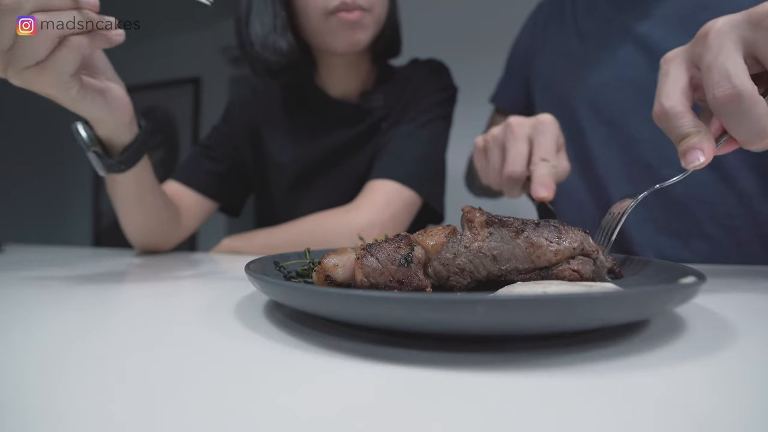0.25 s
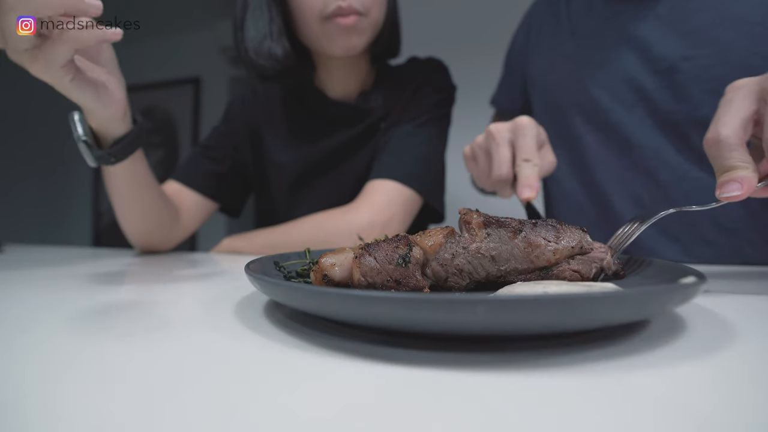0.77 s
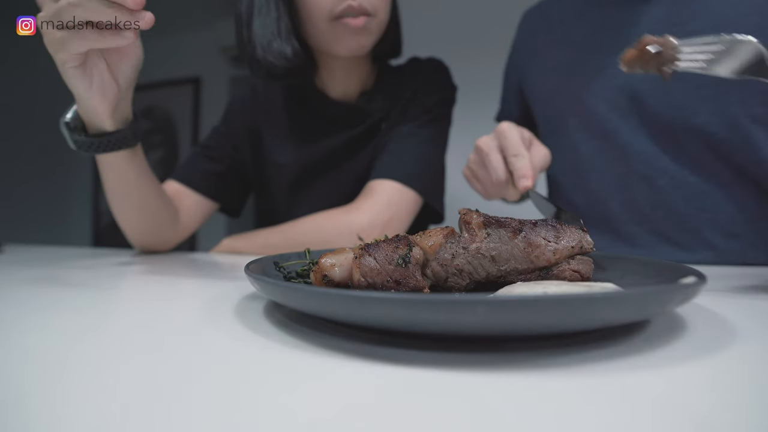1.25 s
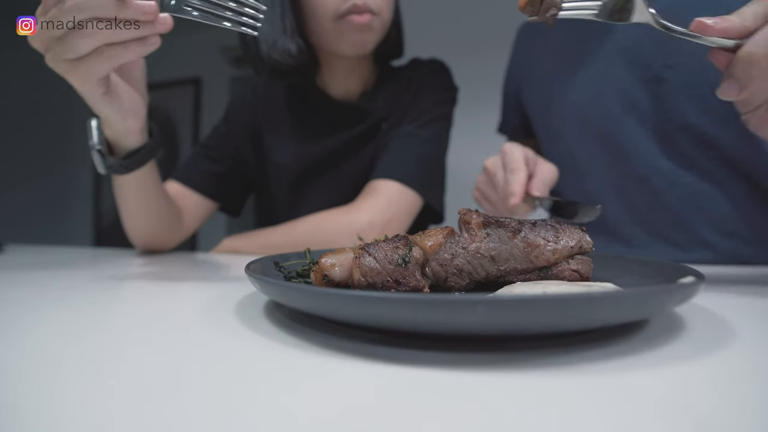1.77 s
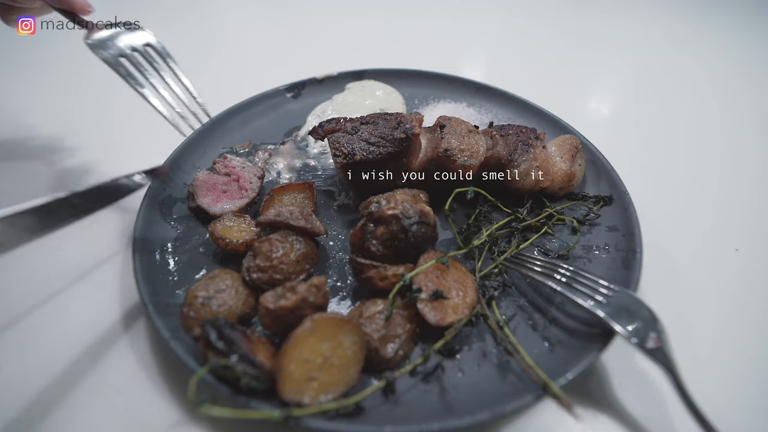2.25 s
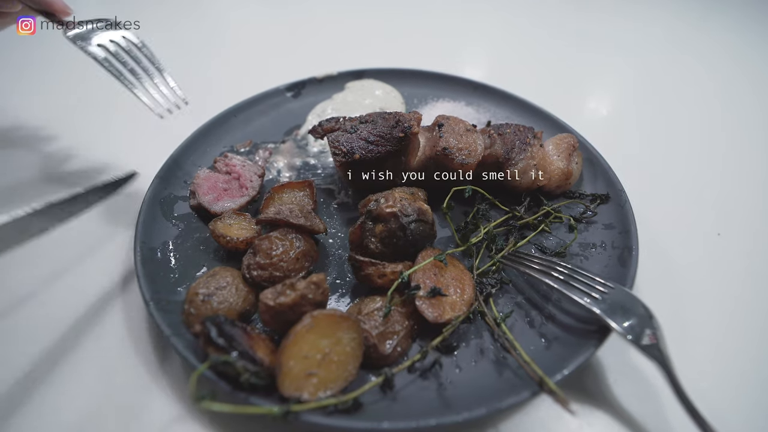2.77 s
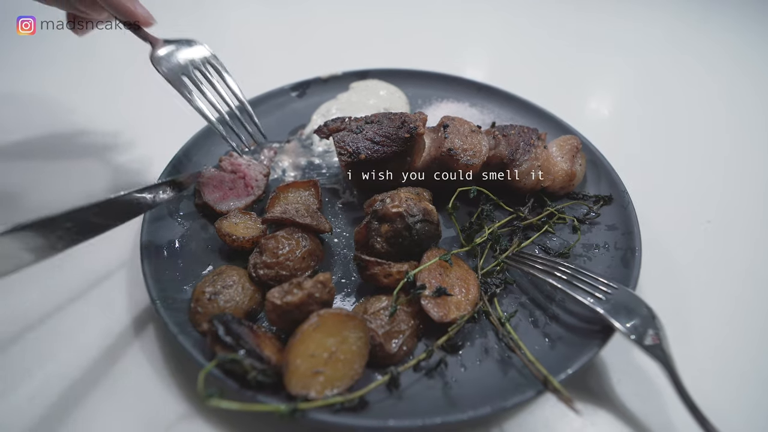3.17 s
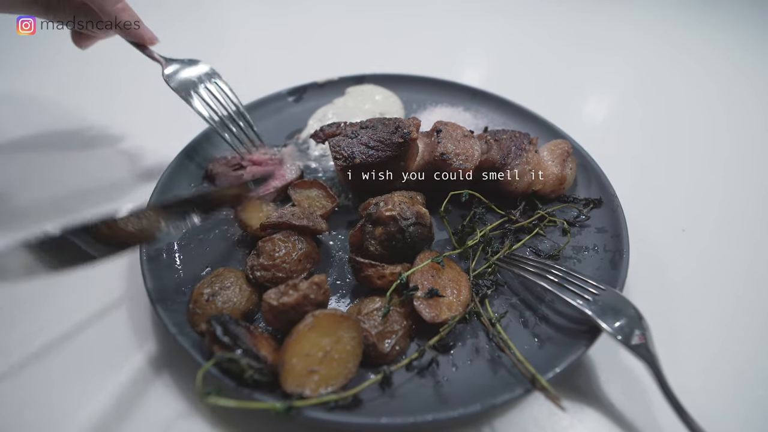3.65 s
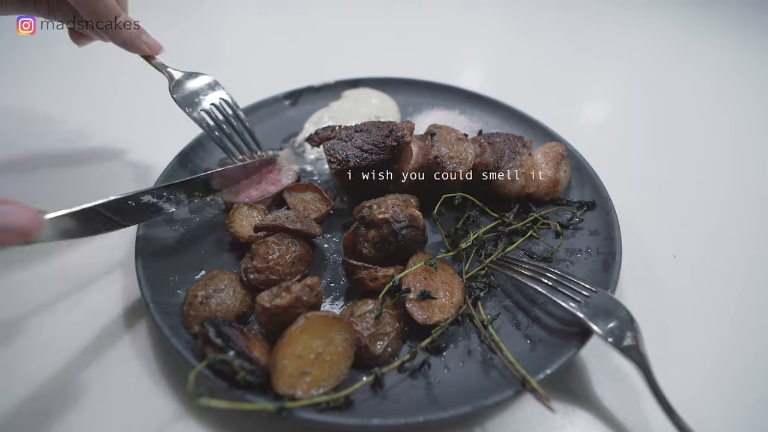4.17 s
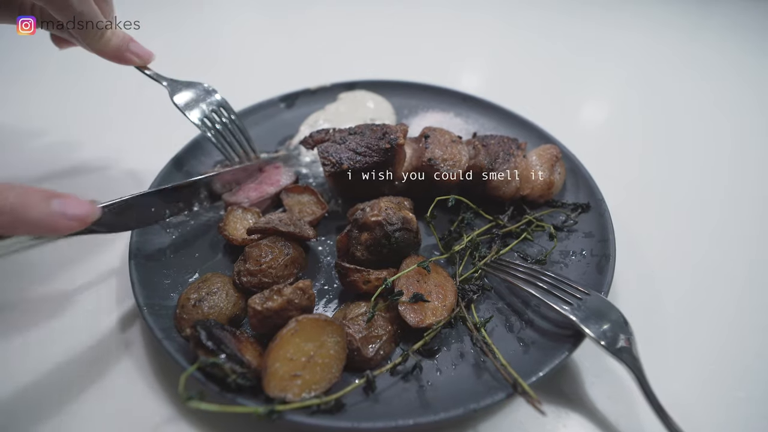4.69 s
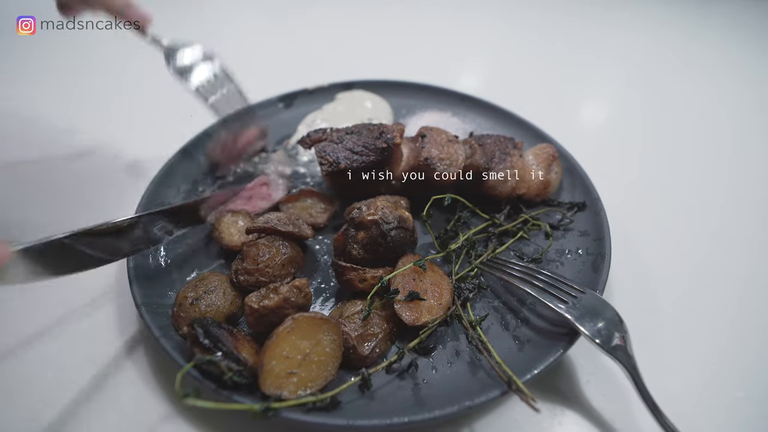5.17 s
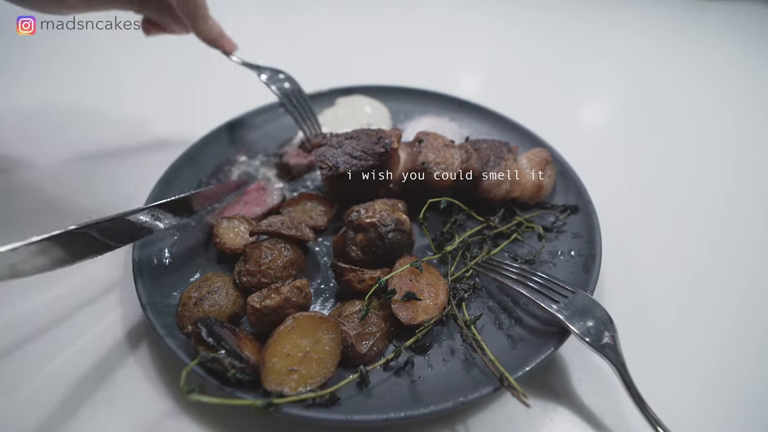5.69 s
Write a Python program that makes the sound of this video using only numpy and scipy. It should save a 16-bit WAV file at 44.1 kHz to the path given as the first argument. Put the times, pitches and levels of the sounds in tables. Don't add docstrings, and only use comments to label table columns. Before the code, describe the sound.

Cutlery on a plate in a bare room: sharp opening clacks, faint sawing and ticks, a scene change, then ringing blows and a juddering scrape.

```python
import sys
import numpy as np
from scipy import signal
from scipy.fft import rfft, irfft, next_fast_len
from scipy.io import wavfile
from scipy.ndimage import map_coordinates

SR = 44100
rng = np.random.default_rng(int(sys.argv[2]) if len(sys.argv) > 2 else 0)


def volts_from_decibels(level):
    exponent = np.asarray(level, float) / 20
    return 10 ** exponent


def bounce(signal):
    frames = np.transpose(np.atleast_2d(signal))
    limited = np.clip(frames, -1, 1)
    pcm = np.round(limited * 32767).astype(np.int16)
    wavfile.write(sys.argv[1], SR, pcm)


N = 261513
T = np.arange(N) / SR
CUT_S = 2.2018

# t/s, peak level/dB, thud level/dB, room level/dB, bite level/dB
BLOWS = [
    (0.0645, -0.4, -15, -28.5, -16.5),
    (0.3553, -3.5, -18, -26.5, -26.5),
    (3.3911, -1.5, -12, -2, -20.5),
    (4.6158, -5.5, -16.5, -6, -20.5),
]
# f/Hz, level/dB, swell/ms
CLACK_MODES = [[(2430, -3.5, 2.0), (2700, 0, 2.4), (3000, -12, 1.6), (3300, 0, 2.3)] + [ (4090, -27, 1.5),
               (5290, -20, 1.4), (5700, -14, .9), (6270, -23, 2.5), (8790, -18, 1.5), (11000, -36, .6),
               (12800, -36, 1.2), (14800, -36, .5)], [(2450, -1, 2.2), (2750, -6, 2.4), (3000, -12, 1.6),
               (3270, 0, 2.2)] + [ (3730, -12, 2.8), (5240, -26, 1.6), (6260, -26, 2.5), (8630, -19, 1.6),
               (10300, -36, 1.5), (11700, -36, .6), (13200, -30, .9), (14700, -31, .5)], [(2450, -6, 1.6),
               (2850, -2, 1.1), (3240, 0, 1.3), (3930, -1, 1.2), (4800, -14, 1.5), (5610, -11, 1.1),
               (6310, -14, 1.6), (7780, -21, 1.6), (9460, -32, 1.3), (11200, -36, 1.3), (13700, -44, .6)],
               [(1790, -1, 1.3), (2260, -9, 1.8), (2630, -2, 1.6), (2910, -3, 1.6), (3350, -1, 1.4),
               (3570, -8, 2.5), (3940, -8, 1.5), (4720, -11, 1.3), (6380, -13, 1.2), (7870, -19, 1.4),
               (9500, -26, 1.3), (11300, -26, 1.5)]]
CLACK_SENSE = [1, 1, -1, 1]
AFTERRING_DB = [-16.5, -14, -13, -19]
AFTERRING_S = 0.064
# f/Hz, width/Hz, level/dB
THUD_MODES = [
    [(397.3, 125, 7.5), (1021, 150, 7.5)],
    [(316, 76, -6), (972, 220, -10.5)],
    [(552, 94, 5), (786, 37, 8), (1060, 260, 3.5)],
    [(715, 170, -2.5), (1200, 160, 0)],
]
# f/Hz, width/Hz, level/dB
LASTING_EARLY = [
    [(2447, 160, 3), (2754, 160, 6), (3350, 160, 2.5), (5770, 1294, 6), (8740, 550, -19)],
    [(2450, 150, -5), (2760, 150, -3), (3380, 160, -4), (5780, 790, -8), (8580, 490, -11)],
]
# f/Hz, width/Hz, level/dB
LASTING_LATE = [[(510, 113, -14.5), (640, 215, -11.0), (903, 69, -14.0), (1210, 210, -13.5),
                (1545, 360, -36.0), (2140, 270, -15.0), (2473, 90, -7.0), (2990, 300, -9.5),
                (3273, 130, -3.5), (3370, 98, 0.5), (3480, 35, -11), (3650, 96, -5.5), (4050, 170, -14.5),
                (5510, 290, -18.5)] + [(350, 110, -25.5), (4800, 1730, -21.0), (8300, 2600, -37),
                (12000, 4400, -56.0), (4900, 590, -23.5)], [(726, 170, 2.0), (1356, 136, 3.5),
                (2170, 53, -2.0), (2580, 61, -3), (2910, 66, -9), (3453, 33, 8.5), (3505, 87, 9.0),
                (3940, 32, -22.0), (4450, 380, -9.0), (5750, 120, -1.5)] + [(2000, 1660, 4.0),
                (4400, 2700, -32.0), (7600, 1500, -20.0), (12500, 3000, -66), (4860, 210, -13.5)]]
STEEL_HZ = [
    [],
    [],
    [2455, 3391, 4807, 6280, 6272, 7817, 9430, 11170],
    [3456, 3560, 4807, 4910, 6365, 6390, 7800, 9510, 11300],
]
# level/dB, t60/s
STEEL_DECAY = [
    [],
    [],
    [(-31.5, 0.59), (-30, 0.55), (-29.5, 0.56), (-32.5, 0.43), (-44.5, 0.86), (-44, 0.39), (-55, 0.39),
     (-53, .3)],
    [(-40, 0.57), (-41, 0.65), (-48, 0.61), (-45, 0.25), (-23.5, 0.059), (-46, 0.32), (-47, 0.45),
     (-55, 0.54), (-47, 0.2)],
]
SLAP_S = [.0325, 0.033, .028, 0.052]
SLAP_DB = [-24, -21.5, -21.5, -17]

# peak t/s, level/dB, rise/s, fall/s, brightness/dB
PUSHES = [
    [(.074, -29, 0.017, 0.056, -10), (.12, -40.5, 0.056, 0.15, -25), (.29, -59.5, .12, 0.073, 1.5)],
    [(.372, -34, 0.031, 0.08, -10.5), (.465, -39, 0.12, 0.044, -22)],
    [(.6, -41.5, 0.0062, 0.069, -22), (.645, -43, 0.084, 0.059, -16), (.785, -43, 0.091, 0.052, -11.5),
     (.82, -48, 0.046, 0.015, -22)],
    [(4.882, -44, 0.029, 0.061, -1.5), (4.915, -42, 0.1, 0.098, -11), (5.082, -39.5, 0.1, 0.093, -17)],
    [(5.819, -47, 0.034, 0.045, -37), (5.826, -33, 0.0037, 0.13, -8), (5.925, -57, 0.027, .05, -25)],
    [(.915, -49, 0.11, 0.12, -13), (.955, -54, .07, 0.025, -16), (1.113, -48.5, 0.18, 0.065, -10.5)],
    [(5.185, -62, .04, .05, -5), (5.222, -43, 0.037, 0.069, -16.5), (5.264, -37.5, 0.082, 0.022, -15.5)],
    [(.645, -51, 0.063, 0.051, -20), (.745, -55, 0.05, 0.091, -18), (.805, -49.5, 0.062, 0.03, -8),
     (.885, -58, .04, 0.05, -20), (1.06, -51, 0.074, .03, -17)],
    [(5.3, -43, 0.096, 0.061, -13.5), (5.335, -53.5, 0.056, 0.039, -6), (5.4, -71, .08, .15, -7)],
    [(3.635, -37, 0.038, .09, -42), (3.675, -37, 0.12, 0.065, -42.5), (3.79, -47, .08, 0.073, -42),
     (3.85, -44.5, 0.12, 0.048, -45)],
]
# f/Hz, width/Hz, level/dB
PUSHED_MODES = [
    [(2460, 160, 0), (2806, 150, 1), (3410, 200, 0), (5650, 470, -13), (8400, 1500, -22),
     (14300, 1940, -30)],
    [(2475, 260, -2.5), (2720, 240, 0), (3325, 240, 4), (5750, 384, -18), (6160, 170, -17),
     (8500, 1200, -22.5), (14310, 2400, -28.5)],
    [(1320, 170, -3.5), (2370, 210, -2.5), (2760, 220, -3), (3370, 260, -9), (4900, 150, -24),
     (5900, 500, -24), (7600, 340, -20), (9700, 600, -24.5), (12900, 400, -26), (14240, 300, -23)],
    [(2455, 62, 1), (2910, 210, -0.5), (3470, 270, 0), (5000, 130, -13.5), (5770, 370, -11.5),
     (6000, 290, -6), (7950, 290, -16), (9000, 450, -12), (13400, 1400, -33)],
]
# f/Hz, width/Hz, level/dB
PUSHED_MODES_LATE = [
    [(2500, 150, -7), (2875, 160, -18.5), (3984, 190, -9), (4000, 310, -15), (4670, 230, -12.5),
     (6260, 350, -29), (7400, 500, -25), (8500, 360, -28.5), (9400, 280, -42)],
    [(2440, 310, -0.5), (2720, 280, -18), (3390, 360, -3.5), (4770, 150, -17), (5800, 460, -26),
     (7700, 400, -18), (9840, 370, -18), (13200, 500, -18), (14300, 300, -34)],
    [(2465, 49, 0.5), (2980, 210, 2), (3550, 230, -1), (5660, 290, -10), (9050, 600, -25),
     (13600, 1400, -33.5)],
    [(3400, 310, 0), (5900, 300, -11)],
    [(2490, 90, 4.5), (2900, 300, 0.5), (3640, 370, -14), (5660, 380, -8), (9050, 600, -28)],
    [(2487, 45, -13.5), (3280, 80, -3.5), (3393, 78, -1)],
]
# f/Hz, width/Hz, level/dB
DENSE_MODES = [(3350, 680, -22.5), (5730, 880, -23.5), (8930, 1000, -29.5), (13500, 2840, -47.5)]
DENSE_DB = [-4.5, 0.5, -1, -13, -12, 10.5, -17.5, -12, -20, -4]
EDGE_DB = 24
LINGER_DB, LINGER = -23, 3

# t/s, peak level/dB, swell/ms
JUDDER = [(0.054, -40, 7.6), (.345, -39, 7), (5.779, -53, 3.8), (5.792, -55, 5), (5.806, -37, 4.2),
          (5.816, -26.5, 3.5), (5.824, -19, 3.3), (5.827, -18.5, 4.6), (5.836, -21.5, 2.5),
          (5.842, -22, 2.8), (5.845, -31, 1.9), (5.858, -25, 2.7), (5.865, -24, 2.4), (5.875, -33, 3),
          (5.893, -33, 2.8), (5.9105, -27.5, 1.8), (5.916, -35, 2.7), (5.9205, -28, 3)]
JUDDER_HZ, JUDDER_SPREAD = 2477, 0.0088

# t/s, peak level/dB, f/Hz
LOW_TICKS = [(.5995, -28.5, 2580), (.9068, -36, 2360), (1.0913, -29.5, 2720), (1.1107, -31, 2450),
             (1.116, -34, 2400), (4.1898, -35, 3400), (4.2392, -27, 3250), (4.2395, -30.5, 2500),
             (4.2445, -42, 2500), (4.2497, -37, 2560), (4.2635, -46, 2600), (4.2497, -41, 3250),
             (4.2914, -46, 2650), (5.0674, -48, 2960), (5.0774, -28, 2910), (5.0899, -27, 3390),
             (5.5324, -46, 3700), (5.55, -47, 3540), (5.583, -44.5, 3650), (5.7464, -34.5, 3390),
             (.715, -43, 3300), (.7784, -36, 2600), (.8712, -43, 2580), (1.0338, -38.5, 2660),
             (5.0449, -45, 3400), (5.1347, -35, 3400), (5.1895, -40, 2900), (5.2155, -45, 3400),
             (5.8245, -26, 3960), (5.8555, -23, 3970)]
# t/s, peak level/dB, f/Hz
HIGH_TICKS = [(.318, -42, 13500), (1.143, -48, 10500), (2.1733, -23, 6900), (2.2006, -34, 5150),
              (4.114, -49.5, 7400), (4.2388, -30, 6950), (4.2447, -28.5, 7170), (4.2842, -40, 7300),
              (4.2884, -41, 7450), (4.2974, -46.5, 7400), (4.3241, -42.5, 7100), (4.8489, -32, 6400),
              (5.0255, -18.5, 6300), (5.0334, -40, 5780), (5.0903, -30, 5660), (5.0964, -44, 5820),
              (5.1114, -43, 5430), (5.3253, -39, 5660), (5.5248, -54, 6400), (5.534, -53.5, 5900),
              (5.546, -57, 7600), (5.5493, -52, 5500), (5.5837, -52, 5640), (5.5947, -49, 6240),
              (5.7544, -55, 6440), (5.848, -34.5, 8500), (5.856, -38, 8500)]
# t/s, peak level/dB, f/Hz
OVERTONES = [(2.173, -28.5, 8740), (2.1737, -25, 4330), (3.6258, -56, 8400), (4.114, -57, 10500),
             (4.19, -50, 2200), (4.19, -57, 4900), (4.19, -57, 6300), (4.2843, -43, 1900),
             (4.2843, -43, 5900), (4.2845, -42, 4260), (4.2845, -49, 8500), (4.849, -40, 4880),
             (4.849, -43, 7400), (4.849, -40, 9000), (5.0334, -45, 7200), (5.0903, -44, 7800),
             (5.0903, -48, 9900), (5.0964, -43, 7500), (5.326, -38.5, 7150), (5.326, -46, 9000)]
# t/s, peak level/dB, f/Hz
BUMPS = [(.0968, -20, 350), (.3885, -22, 350), (.999, -22, 1200), (4.863, -24.5, 593), (5.755, -26, 634)]
# t/s, peak level/dB, f/Hz
TABLE_HUMS = [(1.1, -40.5, 788), (5.06, -46.5, 850)]
# t/s, peak level/dB, f/Hz
FORK_PINGS = [(.66, -64, 4800), (1.11, -62, 4800)]

# f/Hz, t60/s
WALLS = [(300, 0.57), (800, 0.52), (1500, 0.49), (2400, 0.89), (3400, 0.98), (4500, 0.753), (6000, 0.65),
         (9000, 0.29), (15000, 0.17)]

# hum level/dB, hum drift/(dB/s), settled hiss/dB, extra hiss at the start/dB, settling/s
SHOTS = [
    (-40.5, -0.9, -68.5, 4.5, 1.6),
    (-49.5, -0.24, -76, 10, 0.33),
]
# f/Hz, level/dB
HUM = [
    [(24, -51.5), (40, -29.5), (64, -24.5), (83, -25), (142, 0.5), (287, 0), (360, -6), (413, -4),
     (635, -9.5), (815, -5.5), (1120, -12.5), (1280, -13), (9000, -59.5), (11700, -75), (19800, -120)],
    [(24, -43.5), (40, -29), (64, -41.5), (81, -16), (159, -4), (195, -3.5), (495, -9.5), (593, -11.5),
     (711, -10), (833, -12.5), (1310, -15.5), (2830, -33.5), (9000, -63), (11700, -80.5), (19800, -120)],
]
# f/Hz, level/dB
AIR = [(1500, -4), (2500, 1.5), (4000, 6), (6000, 6.5)]
# f/Hz, level/dB
NULL = [(105, 0), (120, -10), (132, 0), (170, 0), (185, -4), (200, 0)]
# f/Hz, width/Hz, level/dB
DRONE = [(99, 12, -8), (135, 9, -2), (160, 10, 0), (234, 10, -5), (288, 6, 3), (425, 10, -8),
         (726, 10, -11)]
# f/Hz, level/dB
HISS = [(2000, -33), (5000, -4), (8000, -1), (12000, -3), (15500, -4.5)]
FAN_S, FAN_DB, FAN_BACK_S = 3.1, -1.5, 1


def blows():
    out, t = np.zeros(N), np.arange(SR) / SR
    for k, (s, db, thud_db, room_db, bite_db) in enumerate(BLOWS):
        clack = peak(damped_clack(k, t))
        thud = filtered(impulse(t), modes(THUD_MODES[k], order=2))
        near = volts_from_decibels(db) * (clack + volts_from_decibels(bite_db) * peak(glaze_bite(t)) + volts_from_decibels(thud_db) * peak(thud))
        lasting = lasting_lines(k, t)
        lasting = lasting * volts_from_decibels(room_db) * np.linalg.norm(near) / np.linalg.norm(lasting)
        steel = free_steel(k, t)
        slap = filtered(volts_from_decibels(db) * clack, modes([(3400, 863, 0.0015)]))
        add(out, s, near)
        add(out, s + .001, steel + 0.338 * lasting)
        add(out, s + SLAP_S[k], volts_from_decibels(SLAP_DB[k]) * slap)
        add(out, s, room(lasting + 0.23 * steel + volts_from_decibels(room_db - 17.5) * near))
    return out


def damped_clack(k, t):
    out = 0
    for j, (hz, level, ms) in enumerate(CLACK_MODES[k]):
        u = t * 1000 / ms
        pressed = (u * np.exp(1 - u)) ** 2
        afterring = volts_from_decibels(AFTERRING_DB[k] - 60 * t * 2 / (AFTERRING_S * ms)) * (1 - np.exp(-u)) ** 2
        out = out + CLACK_SENSE[k] ** j * volts_from_decibels(level) * (pressed + afterring) * np.sin(2 * np.pi * hz * t)
    return out


def glaze_bite(t):
    onset = 1 - np.exp(-(t / 0.00025) ** 2)
    burst = rng.standard_normal(len(t)) * volts_from_decibels(-60 * t / 0.016) * onset
    return filtered(burst, modes(DENSE_MODES))


def lasting_lines(k, t):
    lines = filtered(impulse(t), modes((LASTING_EARLY + LASTING_LATE)[k], order=2, sense=0.96))
    dull_hz = 9500
    return filtered(lines, lambda f: (1 - (f / dull_hz) ** 2 + 1.4j * f / dull_hz) ** -2)


def free_steel(k, t):
    out = 0
    for hz, (level, t60) in zip(STEEL_HZ[k], STEEL_DECAY[k]):
        beat_db = 4 * np.tanh(wobble(t, rate=65))
        phase = 2 * np.pi * hz * t + .65 * wobble(t, rate=65)
        out = out + volts_from_decibels(level - 60 * t / t60 + beat_db) * np.sin(phase)
    return out


def strokes():
    out = np.zeros(N)
    for rows, excited, dense_db in zip(PUSHES, PUSHED_MODES + PUSHED_MODES_LATE, DENSE_DB):
        start = max(rows[0][0] - LINGER * rows[0][2], 0)
        end = rows[-1][0] + 2 * LINGER * rows[-1][3]
        t = np.arange(round(start * SR), round(end * SR)) / SR
        force = bright = 0
        for s, db, rise, fall, bright_db in rows:
            away = np.where(t < s, (s - t) / rise, (t - s) / fall)
            press = volts_from_decibels(db) * (volts_from_decibels(-EDGE_DB * away) + volts_from_decibels(LINGER_DB - EDGE_DB * (away / LINGER) ** 2))
            force = force + press
            bright = bright + press * volts_from_decibels(bright_db)
        excited = excited + [(hz, width, db + dense_db) for hz, width, db in DENSE_MODES]
        plate = [m for m in excited if m[0] < 4350]
        blade = [m for m in excited if m[0] >= 4350]
        drag = slips(len(t), rate=1300, spread_db=3.0)
        body = filtered(force * drag, modes(plate, order=2)) / filtered(drag, modes(plate, order=2)).std()
        rub = slips(len(t), rate=2340, spread_db=5.0)
        edge = sum(filtered(rub, modes([m], order=2)) * volts_from_decibels(2.5 * wobble(t, rate=18.8)) for m in blade)
        add(out, start, body + bright * unit(edge))
    return out


def slips(size, rate, spread_db):
    strength = volts_from_decibels(spread_db * np.minimum(rng.exponential(size=size), 3))
    catches = (rng.random(size) < rate / SR) * strength
    return unit(catches * rng.standard_normal(size)) + rng.standard_normal(size)


def judder():
    out, t = np.zeros(N), np.arange(SR // 20) / SR
    for k, (s, db, ms) in enumerate(JUDDER):
        u = t * 1000 / ms
        shift = JUDDER_SPREAD * rng.standard_normal()
        tone = np.sin(2 * np.pi * JUDDER_HZ * (s + t + shift * t))
        add(out, s, (-1) ** k * volts_from_decibels(db) * (u * np.exp(1 - u)) ** 2 * tone)
    return out


def touches():
    low = ticks(LOW_TICKS, crack=1.0, t60=0.014, at_hz=2900)
    high = ticks(HIGH_TICKS + OVERTONES, crack=1.2, t60=0.0078, at_hz=6465)
    bumps = ticks(BUMPS, crack=.1, t60=0.0072, at_hz=601)
    bumps = filtered(bumps, lambda hz: (1j * hz / (1j * hz + 150)) ** 2)
    hums = ticks(TABLE_HUMS, crack=.1, t60=0.13, at_hz=863)
    pings = ticks(FORK_PINGS, crack=.1, t60=.25, at_hz=4800)
    return low + high + bumps + hums + pings


def ticks(table, crack, t60, at_hz):
    out, t = np.zeros(N), np.arange(SR // 8) / SR
    onset = (1 - np.exp(-t / 0.00051)) ** 2
    for s, db, hz in table:
        neighbour = np.sin(2 * np.pi * hz * t * rng.uniform(1.08, 1.1))
        ring = np.sin(2 * np.pi * hz * t) + 0.43 * neighbour
        burst = rng.standard_normal(len(t)) * volts_from_decibels(-60 * t / 0.0069) * onset
        snap = filtered(burst, modes([(hz * .98, hz * 0.13, 0)], order=4))
        fade = volts_from_decibels(-60 * t / t60 * (hz / at_hz) ** 0.92)
        add(out, s, volts_from_decibels(db) * (1.47 * ring * fade * onset + 3 * crack * snap))
    return out


def room(x):
    hz, t, z = signal.stft(rng.standard_normal(SR), SR, nperseg=256)
    tail = signal.istft(z * volts_from_decibels(-60 * t / along(WALLS, hz)[:, None]), SR, nperseg=256)[1]
    tail = tail * np.clip(np.arange(len(tail)) / SR / 0.0043, 0, 1)
    return signal.fftconvolve(x, tail / np.linalg.norm(tail))


def background():
    late = T >= CUT_S
    hum_db, drift, hiss_db, extra_db, settle = np.array(SHOTS)[1 * late].T
    since = T - CUT_S * late
    first, second = (noise(lambda f: volts_from_decibels(along(h, f) + along(AIR, f) + along(NULL, f))) for h in HUM)
    drone = noise(modes(DRONE, order=2))
    hum = np.where(late, second + 0.34 * drone, first + 0.39 * drone)
    dip_db = FAN_DB * (T > FAN_S) * np.exp(-abs(T - FAN_S) / FAN_BACK_S)
    hum_db = hum_db + drift * since + dip_db + 0.49 * wobble(T, rate=7)
    hiss = noise(lambda f: volts_from_decibels(along(HISS, f)))
    hiss_db = hiss_db + extra_db * np.clip(1 - since / settle, 0, 1)
    return volts_from_decibels(hum_db) * hum + volts_from_decibels(hiss_db) * hiss


def noise(response):
    return unit(filtered(rng.standard_normal(N), response))


def modes(table, order=1, sense=-1):
    widen = 1 / np.sqrt(2 ** (1 / order) - 1)

    def response(f):
        total = 0
        for k, (centre, width, db) in enumerate(table):
            loss = 1j * f * width * widen
            total = total + sense ** k * volts_from_decibels(db) * (loss / (centre * centre - f * f + loss)) ** order
        return total
    return response


def filtered(x, response):
    m = next_fast_len(len(x) + SR // 4)
    return irfft(rfft(x, m) * response(np.fft.rfftfreq(m, 1 / SR)), m)[:len(x)]


def along(points, hz):
    f, v = np.transpose(points)
    return np.interp(np.log(hz + 1), np.log(f + 1), v)


def wobble(t, rate):
    knots = rng.standard_normal(int((t[-1] - t[0]) * rate) + 4)
    return map_coordinates(knots, [(t - t[0]) * rate])


def impulse(t):
    return 1. * (t == 0)


def peak(x):
    return x / abs(x).max()


def unit(x):
    return x / np.sqrt(np.mean(x ** 2) + 1e-20)


def add(track, s, sound):
    part = track[round(s * SR):][:len(sound)]
    part += sound[:len(part)]


def scene():
    touching = touches()
    rubbing = strokes() + judder()
    sent = volts_from_decibels(-16.0) * touching + volts_from_decibels(-18.0) * rubbing
    early = T < CUT_S
    wet = room(sent * early)[:N] * early + room(sent * ~early)[:N]
    return (blows() + touching + rubbing + wet + background())[None]


def roll_off(x):
    return signal.sosfilt(signal.butter(12, 16660, fs=SR, output="sos"), x)


def record(dry):
    splice = np.where(T < CUT_S, 1, np.clip((T - CUT_S) / 0.02, .05, 1))
    microphone = lambda hz: (hz < 16200) * (1j * hz / (1j * hz + 27)) ** 2
    mix = filtered(dry[0] * splice, microphone)[None]
    return roll_off(mix)


dry = scene()
out = record(dry)
bounce(out)
```